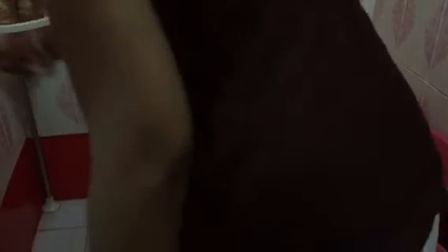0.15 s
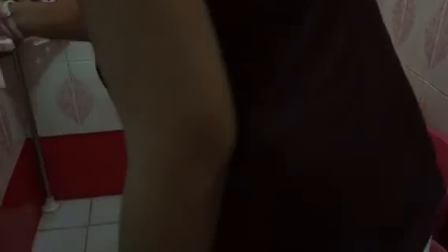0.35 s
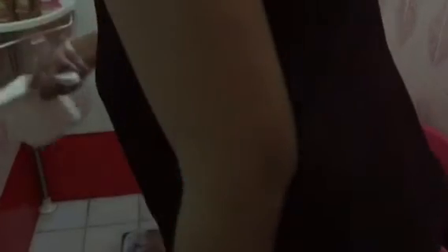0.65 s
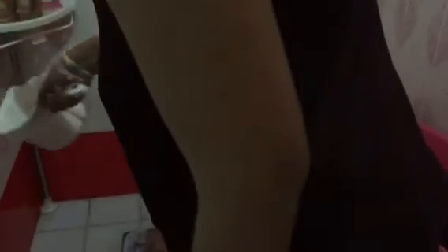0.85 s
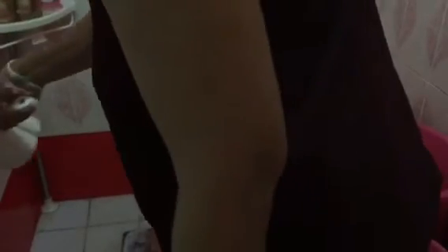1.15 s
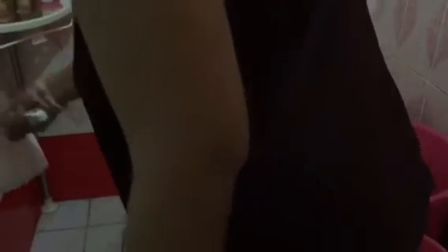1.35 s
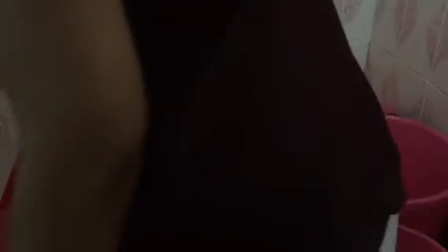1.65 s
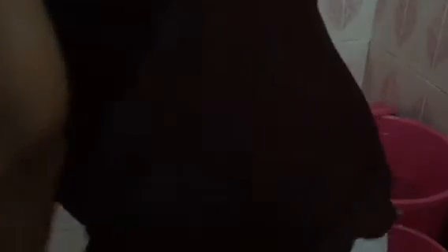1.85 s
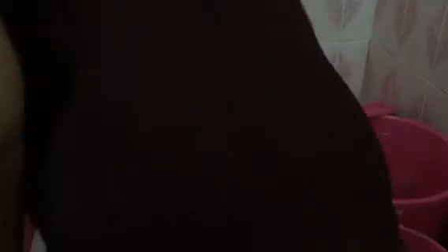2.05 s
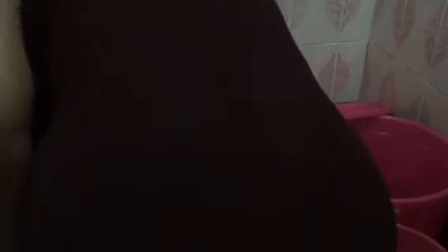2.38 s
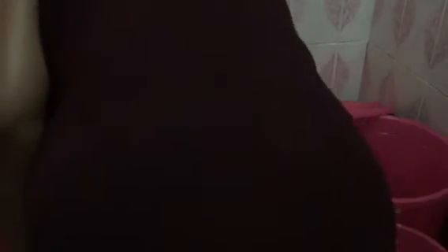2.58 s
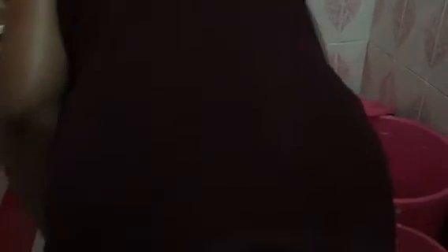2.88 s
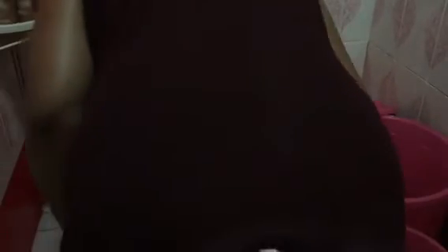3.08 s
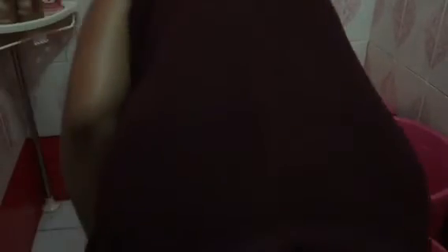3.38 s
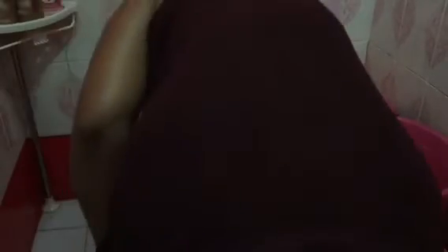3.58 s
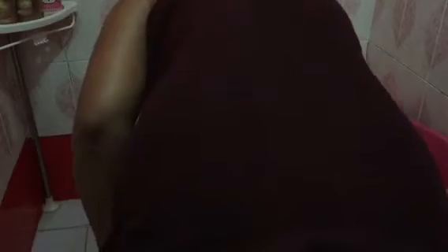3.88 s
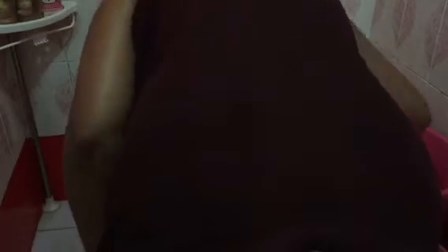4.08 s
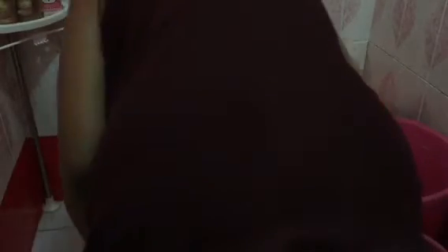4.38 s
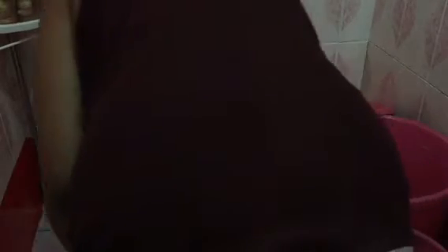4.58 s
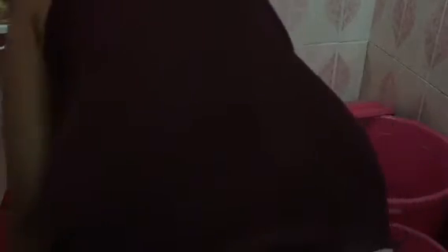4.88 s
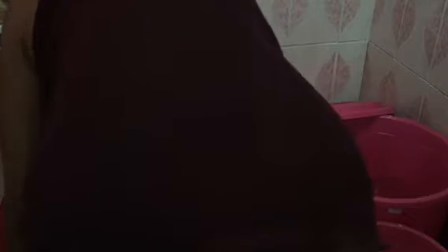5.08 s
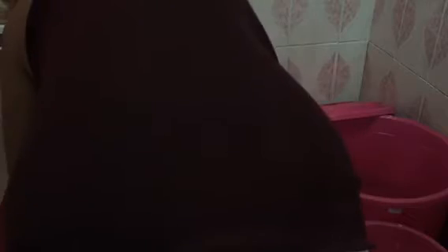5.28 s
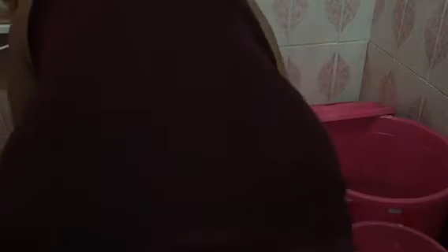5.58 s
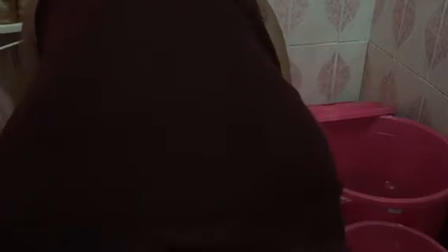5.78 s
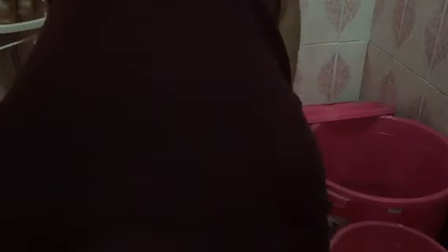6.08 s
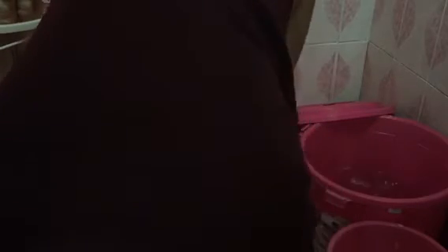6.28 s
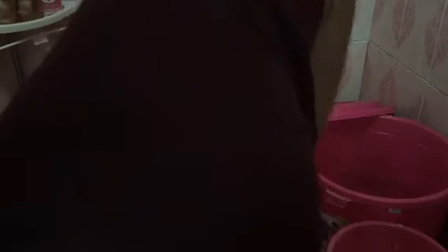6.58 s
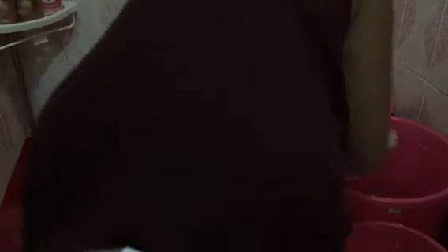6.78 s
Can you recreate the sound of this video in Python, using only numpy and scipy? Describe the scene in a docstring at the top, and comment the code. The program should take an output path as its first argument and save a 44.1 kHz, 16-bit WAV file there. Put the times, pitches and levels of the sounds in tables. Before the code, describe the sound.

Irregular splashes slap wet tiles in a small echoing bathroom, with glugging scoops, hollow plastic knocks and one heavy bucket thump.

```python
"""Water is flung from a plastic dipper in a small tiled bathroom, slaps on the floor and runs off.
Showers of tiny ringing bubbles make the spray, splash and gurgle; larger single bubbles make drops and glugs.
The walls' tail follows all of these. A plastic dipper knocks and a full bucket lands and rocks: damped modes
plus noise bursts. Below lie sloshing, room air, a trickle and a low hum; both channels are alike."""
import sys
import numpy as np
from scipy import signal
from scipy.fft import rfft, irfft, next_fast_len
from scipy.io import wavfile
from scipy.ndimage import map_coordinates

SR = 44100
rng = np.random.default_rng(int(sys.argv[2]) if len(sys.argv) > 2 else 0)


def materialize(psi):
    """Save the field psi as 16-bit PCM at rate SR to the path in sys.argv[1].

    A 1-D psi becomes a single channel; in a 2-D psi each row is a channel.
    """
    bounded = np.clip(np.atleast_2d(psi).T, -1, 1)
    quanta = np.round(bounded * 32767).astype(np.int16)
    wavfile.write(sys.argv[1], SR, quanta)


N = 306054


def amp(db):
    """Decibels to gain."""
    return 10 ** (np.asarray(db) / 20)


def unit(x):
    """Scale to rms 1."""
    return x / np.sqrt(np.mean(x ** 2) + 1e-20)


def along(points, hz):
    """Interpolate (Hz, value) points on a log frequency axis."""
    point_hz, value = np.transpose(points)
    return np.interp(np.log(hz + 1), np.log(point_hz + 1), value)


def seconds(count):
    """Time axis of count samples."""
    return np.arange(count) / SR


def add(track, s, sound):
    """Mix a sound into the track at time s."""
    start = max(round(s * SR), 0)
    track[start:start + len(sound)] += sound[:N - start]


def coloured(x, spectrum):
    """Filter x by a (Hz, dB) curve, then scale to rms 1."""
    m = next_fast_len(len(x) + 8192)
    gain = amp(along(spectrum, np.fft.rfftfreq(m, 1 / SR)))
    return unit(irfft(rfft(x, m) * gain, m)[:len(x)])


def hiss(spectrum, count):
    """Coloured noise of rms 1."""
    return coloured(rng.standard_normal(count), spectrum)


def wobble(rate):
    """Random curve of straight segments, rate knots a second."""
    knots = rng.standard_normal(int(N * rate / SR) + 4)
    return map_coordinates(knots, [np.arange(N) * rate / SR], order=1)


def swell(s, rise, hold, sag_db, fade_db):
    """Gain of a gush: builds up, sags by sag_db over the hold (negative grows), fades by fade_db a second."""
    age = seconds(N) - s
    held = np.clip((age - rise) / hold, 0, 1)
    after = np.maximum(age - rise - hold, 0)
    return np.clip(age / rise, 0, 1) * amp(-sag_db * held - fade_db * after)


# Decay of the tiled walls' tail. Each row: frequency in Hz, t60 in seconds.
WALL_T60 = [(100, 0.21), (400, 0.22), (1500, 0.21), (5000, 0.16), (15000, 0.28)]


def bathroom(x, wet_db):
    """Direct sound plus the tiled walls' decaying noise tail, drawn anew per spot; response energy is 1."""
    hz, t, z = signal.stft(rng.standard_normal(SR // 2), SR, nperseg=256)
    decay = amp(-60 * t / along(WALL_T60, hz)[:, None])
    tail = signal.istft(z * decay, SR, nperseg=256)[1]
    answer = amp(wet_db) * tail / np.linalg.norm(tail)
    answer[0] += 1
    return signal.fftconvolve(x, answer / np.linalg.norm(answer))


def bubble(t, hz, cycles, rise):
    """A trapped air pocket rings and decays; its pitch climbs as it nears the surface."""
    age = t * hz / cycles
    tone = np.sin(2 * np.pi * hz * t * (1 + rise * age / (age + 2)))
    return tone * np.exp(-age) * (1 - np.exp(-2 * t * hz))


def droplets(rate, low_hz, high_hz, cycles, spread_db, wet_db, size):
    """A shower of rate tiny bubbles a second, uneven in strength, clumped, echoing from ever new spots."""
    when, pitch, strength = rng.random((int(rate * N / SR), 3)).T[:, :, None]
    hz = low_hz * (high_hz / low_hz) ** pitch
    gain = amp(-spread_db * np.log(1 - .98 * strength)) * np.sqrt(hz)
    grains = gain * bubble(seconds(size), hz, cycles, rise=0.22)
    places = (when * N).astype(int) + np.arange(size)
    shower = np.bincount(places.ravel(), grains.ravel(), N)[:N]
    shower = shower * amp(1.1 * wobble(70))
    out, step = np.zeros(N), SR // 16
    for start in range(0, N, step):
        add(out, start / SR, bathroom(shower[start:start + step], wet_db))
    return out


# Throws or surges of water. Each row: start in seconds, rise in seconds, hold in seconds, dribble in seconds,
# sag over the hold in dB, then spray, splash and gurgle levels in relative dB.
THROWS = [ (0.0, 0.0027, .05, .15, 2, -36.5, -33.5, -45),
          (0.212, 0.023, 0.012, .08, 4.5, -33.5, -39.5, -57),
          (0.485, 0.018, 0.032, 0, 5.5, -37, -43.5, -40.5), (0.582, .035, 0.088, 0, 7.5, -28, -31.5, -43.5),
          (0.748, 0.06, 0.077, .23, 11, -27, -32, -39.5), (0.823, 0.042, 0.033, 0, 1, -35, -33.5, -31.5),
          (1.585, 0.029, .105, .2, 0.5, -32.5, -35.5, -43.5),
          (2.004, 0.028, 0.058, .07, -2, -42.5, -51.5, -73), (2.345, 0.025, 0.17, 0, 0.5, -49, -59.5, -66),
          (2.444, 0.013, 0.018, 0, 1, -50, -49, -48.5), (2.557, 0.041, 0.21, 0, 6, -42, -50.5, -75),
          (2.731, 0.026, 0.22, 0, 4, -42, -45, -53.5), (2.966, 0.07, 0.029, .17, 5.5, -37.5, -47.5, -66),
          (3.398, 0.043, 0.056, .1, 9.5, -37, -35.5, -31.5),
          (3.546, 0.089, 0.023, .15, 5.5, -35.5, -28.5, -25.5),
          (3.793, 0.054, 0.16, 0, -6.5, -50.5, -43.5, -43.5), (4.017, 0.025, 0.047, 0, 4, -42, -45, -33.5),
          (4.114, 0.068, 0.16, 0, 6.5, -40, -38.5, -33), (4.331, 0.042, 0.019, 0, 4, -50, -42.5, -33.5),
          (4.507, 0.017, 0.13, 0, 1.5, -38, -46, -60), (4.695, 0.023, 0.29, 0, 12, -30.5, -30, -39.5),
          (4.952, 0.07, .11, 0, 2.5, -35, -31.5, -40), (5.14, 0.027, 0.25, 0, 4, -38.5, -49, -57),
          (5.404, 0.016, 0.012, 0, 8.5, -37.5, -34.5, -60), (5.993, 0.2, .24, 0, -6.5, -49, -54.5, -73),
          (6.083, 0.015, 0.011, 0, 5.5, -64, -40.5, -63), (6.29, 0.012, 0.013, 0, 5.5, -50, -40, -68),
          (6.359, 0.11, 0.2, 0, 3.5, -30.5, -30, -41.5), (6.677, 0.026, 0.09, 0, 2.5, -29.5, -32.5, -43),
          (6.798, 0.035, 0.07, 0, 1, -29.5, -30.5, -42), ]
# Last water off the dipper's lip, against its throw: spray, splash and gurgle in dB.
LIP_DB = (-11.5, -9.5, -16.5)
RELEASE_DB_PER_S, DRIBBLE_FADE_DB_PER_S = 198, 60  # a pour dies away with the room
POOL_S = 0.012  # large bubbles build up later, as a pool forms
UNEVEN_DB, UNEVEN_PER_S = 1.0, 28  # water leaves the dipper in lumps


def flow():
    """Spray, splash and gurgle gains: each throw swells, may end in a dribble, and adds its power."""
    power = np.zeros((3, N))
    for s, rise, hold, dribble, sag_db, *levels_db in THROWS:
        gush = np.tile(swell(s, rise, hold, sag_db, RELEASE_DB_PER_S), (3, 1))
        if dribble > 0:
            runoff = swell(s + hold, rise, dribble, DRIBBLE_FADE_DB_PER_S * dribble, RELEASE_DB_PER_S)
            gush = np.maximum(gush, amp(LIP_DB)[:, None] * runoff)
        gush[2] *= np.clip((seconds(N) - s) / (rise + POOL_S), 0, 1)
        power += (amp(levels_db)[:, None] * gush) ** 2
    lumps_db = UNEVEN_DB * np.array([wobble(UNEVEN_PER_S) for layer in power])
    return np.sqrt(power) * amp(lumps_db)


# Filters on the three bubble showers. Each row: frequency in Hz, relative level in dB.
SPRAY_TONE = [(1500, -31), (2800, 1.5), (3800, -3.5), (4800, -5), (5800, -2.5), (8000, -6.5), (9500, -4),
              (10500, -10), (12000, -5), (16000, -10)]
SPLASH_TONE = [(600, -38), (1000, -5.5), (1400, -8), (1900, 1), (3000, -1), (4200, -2.5), (7000, -25)]
GURGLE_TONE = [(100, -12), (300, -3), (500, -13), (650, -1), (850, 2), (1200, -2), (1900, -4), (4000, -61)]


def water():
    """Fine spray crackles, small bubbles splash and larger ones gurgle."""
    spray, splash, gurgle = flow()
    fine = droplets(rate=3500, low_hz=3110, high_hz=13500, cycles=1.04, spread_db=5, wet_db=6.5, size=96)
    small = droplets(rate=1300, low_hz=1096, high_hz=4600, cycles=3.63, spread_db=5.0, wet_db=4.5, size=500)
    large = droplets(rate=320, low_hz=388.3, high_hz=1309, cycles=6.0, spread_db=3, wet_db=7, size=1800)
    out = spray * coloured(fine, SPRAY_TONE)
    out = out + amp(-0.5) * splash * coloured(small, SPLASH_TONE)
    return out + amp(-4.5) * gurgle * coloured(large, GURGLE_TONE)


# Room air spectrum. Each row: frequency in Hz, relative level in dB.
AIR_TONE = [(20, 5), (50, 4), (110, 2), (250, -6), (600, -14), (2000, -18), (5000, -20.5), (16000, -22.5)]
# Hum level, gliding between rows. Each row: time in seconds, peak level in dB.
HUM_DB = [(0.8, -61), (1.2, -71)]
HUM_HZ = 120


def background():
    """Faint room air as noise, a low sine hum, and water trickling off the wet tiles as sparse bubbles."""
    trickle = droplets(rate=200, low_hz=1440, high_hz=8500, cycles=4.7, spread_db=4.5, wet_db=-3, size=500)
    t = seconds(N)
    hum = amp(np.interp(t, *np.transpose(HUM_DB))) * np.sin(2 * np.pi * HUM_HZ * t)
    return amp(-62.0) * hiss(AIR_TONE, N) + amp(-73.5) * unit(trickle) + hum


# Single drops and air pockets. Each row: start in seconds, relative level in dB, starting pitch in Hz.
DROPS = [ (0.029, -12.5, 2240), (0.228, -20, 2000), (0.315, -24.5, 1523), (0.338, -35, 2000),
         (0.492, -32.5, 900), (0.82, -21.5, 1213), (0.849, -24.5, 772), (0.879, -22.5, 626),
         (1.205, -40, 2830), (1.444, -36.5, 1780), (1.477, -34, 3980), (1.64, -21.5, 1230),
         (1.694, -25.5, 946), (1.76, -34, 974), (1.773, -31, 1360), (1.862, -48, 2000), (2.38, -41, 2100),
         (2.461, -29.5, 3000), (2.514, -37.5, 950), (2.846, -32.5, 1410), (2.989, -38, 776),
         (3.07, -33, 1560), (3.18, -34.5, 2040), (3.274, -34.5, 2470), (3.517, -17, 1720),
         (3.797, -30, 6400), (3.936, -25, 3540), (3.989, -21.5, 1850), (4.032, -26, 724),
         (4.139, -26.5, 1550), (4.1715, -10.5, 6870), (5.04, -26.5, 777), (5.17, -27.5, 2070),
         (5.583, -45, 2360), (5.687, -37.5, 5750), (6.041, -36, 2700), (6.096, -24, 2970),
         (6.104, -33, 1650), (6.302, -18, 3580), (6.555, -29.5, 606), (6.709, -19.5, 1565), ]
# Flat slaps of water on tile. Each row: start in seconds, relative level in dB.
TILE_SLAPS = [(0.031, -19), (0.2295, -21), (0.4934, -20.5), (0.582, -18), (0.615, -9.5), (0.888, -12.5),
              (1.425, -36.5), (2.079, -32), (3.4015, -20), (4.1715, -22), (4.511, -31), (4.711, -14),
              (6.129, -28.5), (6.189, -21), (6.3035, -37)]


def drops():
    """A big drop traps one bubble and two weaker ones just after; sheets of water slap the tiles as noise."""
    out, t = np.zeros(N), seconds(SR // 10)
    for s, db, hz in DROPS:
        plop = bubble(t, hz, cycles=5.6, rise=0.14)
        for lag, detune in rng.random((2, 2)):
            late_t = np.maximum(t - .025 * lag, 0)
            plop = plop + amp(-6) * bubble(late_t, hz * (0.907 + .5 * detune), cycles=3.6, rise=0.21)
        add(out, s, amp(db + 1.0) * bathroom(plop, wet_db=4))
    slap_tone = [(500, -10.5), (2000, -13.5), (6000, -2.5), (16000, -11.5)]  # (Hz, dB)
    for s, db in TILE_SLAPS:
        slap = hiss(slap_tone, len(t)) * np.exp(-t / 0.005)
        add(out, s, amp(db - 8.5) * bathroom(slap, wet_db=3.0))
    return out


# Big air pockets as the dipper goes under. Each row: start in seconds, relative level in dB,
# starting pitch in Hz.
AIR_POCKETS = [(3.42, -31.5, 547), (3.445, -39, 316), (3.56, -20, 277.4), (3.585, -17.5, 310),
               (3.607, -15, 401), (3.628, -20.5, 202), (3.645, -34, 418), (3.69, -34, 306),
               (3.86, -20, 402), (3.885, -19.5, 533)]
# Swings of the water in the bucket. Each row: start in seconds, rise in seconds, hold in seconds,
# relative level in dB.
SWINGS = [(0.47, 0.1, 0.04, -52.5), (3.516, 0.093, 0.081, -28), (3.838, 0.039, 0.057, -27.5),
          (4.139, 0.069, 0.17, -36), (4.695, 0.01, 0.045, -45), (6.381, .03, 0.41, -42.5)]
# Sloshing spectrum. Each row: frequency in Hz, relative level in dB.
SLOSH_TONE = [(29, -51.5), (50, -34), (86, 4.5), (146, -10.5), (243, 2), (386, -4.5), (606, -1), (700, -21),
              (910, -64), (1540, -120)]
SLOSH_SAG_DB, SLOSH_FADE_DB_PER_S = 1, 95


def scoop():
    """The dipper gulps air under water as big bubbles; the bucket sloshes as swelling low noise."""
    out, t = np.zeros(N), seconds(SR // 4)
    for s, db, hz in AIR_POCKETS:
        glug = bubble(t, hz, cycles=4.6, rise=0.21)
        add(out, s, amp(db + 4.5) * bathroom(glug, wet_db=-0.5))
    swing = sum(amp(db) * swell(s, rise, hold, SLOSH_SAG_DB, SLOSH_FADE_DB_PER_S)
                for s, rise, hold, db in SWINGS)
    return out + amp(-6.5) * swing * hiss(SLOSH_TONE, N)


def ring(modes, t, detune):
    """Damped modes of a plastic vessel and of the room it knocks in; the shifting water retunes them at every
    blow."""
    out = np.zeros(len(t))
    for hz, db, t60 in modes:
        decay = amp(db + rng.normal(0, 1) - 60 * t / t60)
        out += decay * np.sin(2 * np.pi * (hz * rng.normal(1, detune) * t + rng.random()))
    return out


# Dipper striking the bucket. Each row: start in seconds, relative level in dB, low body shading in dB,
# hollow middle shading in dB.
DIPPER_KNOCKS = [(1.604, -33, -12, -11), (2.181, -12, -4.5, 1.5), (2.503, -35.5, -12, 4),
                 (3.849, -16, -20, 8)]
# Modes rung by each dipper knock, before shading and detuning: the dipper's walls, plus two long-ringing # room
# resonances near 83 and 280 Hz. Each row: frequency in Hz, relative level in dB, t60 in seconds.
DIPPER_MODES = [(83, -2.5, 0.72), (131, -15, .25), (202, -2, 0.51), (238, -1.5, 0.42), (280, -10.5, 0.73),
                (413, -6, 0.11), (654, -9, 0.29), (780, -6, 0.24), (1188, -5.5, 0.22), (1395, -15.5, .21),
                (1708, -4, 0.26), (1720, -11, 0.12), (2000, -4.5, 0.14), (2710, -8.5, 0.14)]
# Clatter spectrum before shading. Each row: frequency in Hz, relative level in dB.
CLATTER_TONE = [(50, -44), (80, -5), (130, -3.5), (205, 1.5), (400, -9.5), (650, -15.5), (950, -16.5),
                (1750, -10.5), (2350, -22), (3400, -24.5), (6000, -39.5), (14000, -57)]


def dipper():
    """Hollow plastic knocks: wall modes, two ringing room resonances and a clatter of noise that dies fast."""
    out, t = np.zeros(N), seconds(SR * 3 // 4)
    for s, db, body_db, hollow_db in DIPPER_KNOCKS:
        shading = [(200, body_db), (520, hollow_db), (1000, 0)]  # (Hz, dB)
        modes = [(hz, level + along(shading, hz), t60) for hz, level, t60 in DIPPER_MODES]
        tone = [(hz, level + along(shading, hz)) for hz, level in CLATTER_TONE]
        clatter = amp(-6.5) * hiss(tone, len(t)) * amp(-60 * t / 0.23)
        knock = amp(-13.5) * ring(modes, t, detune=0.0057) + clatter
        add(out, s, amp(db) * knock * (1 - np.exp(-t / 0.0041)))
    return out


# Full bucket landing, then rocking. Each row: start in seconds, relative level in dB, relative clap level in dB,
# rise time constant in seconds, base boom shading in dB.
BUCKET_CONTACTS = [(5.295, -6.5, -5, 0.013, -1), (5.511, -28, -22, 0.014, -13),
                   (5.615, -31.5, -10, 0.0087, -7), (5.748, -25.5, -36, 0.021, -10),
                   (5.857, -31.5, -19.5, 0.021, -0.5), (5.954, -23, -46, 0.029, -11),
                   (6.061, -36.5, -33, .01, 4.5), (6.154, -35, -42, 0.011, 2),
                   (6.224, -41, -35, 0.0081, 5.5), (6.327, -35.5, -35, 0.014, 1.5)]
# Bucket modes before shading and detuning. Each row: frequency in Hz, relative level in dB, t60 in seconds.
BUCKET_MODES = [(77.3, -17, 0.32), (128.6, -8, 0.16), (162, -7, 0.25), (197, -15, 0.076), (249, -4, 0.075),
                (294.3, -1, 0.23), (348, -2, 0.29), (437, -6, 0.055), (585, -25, 0.075)]
# Spectra of the shaken water and of the contact clap. Each row: frequency in Hz, relative level in dB.
JOLT_TONE = [(50, -23), (100, -5.5), (170, -13), (230, -6.5), (320, -1.5), (460, -6.5), (600, -21.5),
             (1000, -52)]
CONTACT_TONE = [(40, -35), (100, -4.5), (400, 8), (750, -11.5), (1300, -8.5), (2600, -10.5), (4000, -23),
                (8000, -28), (16000, -33)]


def bucket():
    """The heavy bucket thuds down, then tips from edge to edge: modes, shaken water and a sharp noise clap."""
    out, t = np.zeros(N), seconds(SR // 2)
    for s, db, clap_db, rise, boom_db in BUCKET_CONTACTS:
        shading = [(240, boom_db), (340, 0)]  # (Hz, dB)
        modes = [(hz, level + along(shading, hz), t60) for hz, level, t60 in BUCKET_MODES]
        jolt = amp(-8) * hiss(JOLT_TONE, len(t)) * amp(-60 * t / 0.24)
        thud = (amp(-0.5) * ring(modes, t, detune=0.0072) + jolt) * (1 - np.exp(-t / rise))
        clap = amp(clap_db - 4) * hiss(CONTACT_TONE, len(t)) * amp(-60 * t / 0.28)
        clap = clap * (1 - np.exp(-t / 0.0007))
        add(out, s, amp(db) * (thud + clap))
    return out


def scene():
    """All sources at one microphone, alike in both channels."""
    mono = water() + background() + drops() + scoop() + dipper() + bucket()
    return np.array([mono, mono])


TOP_HZ = 16200


def record(dry):
    """The recorder cuts the deep bass, rounds off the loudest peaks and keeps nothing above TOP_HZ."""
    x = signal.sosfilt(signal.butter(3, 58, "highpass", fs=SR, output="sos"), dry)
    x = x / (1 + (x / .62) ** 4) ** (1 / 4)
    m = next_fast_len(N + SR // 4)
    return irfft(rfft(x, m) * (np.fft.rfftfreq(m, 1 / SR) < TOP_HZ), m)[:, :N]


dry = scene()
out = record(dry)
materialize(out)
```